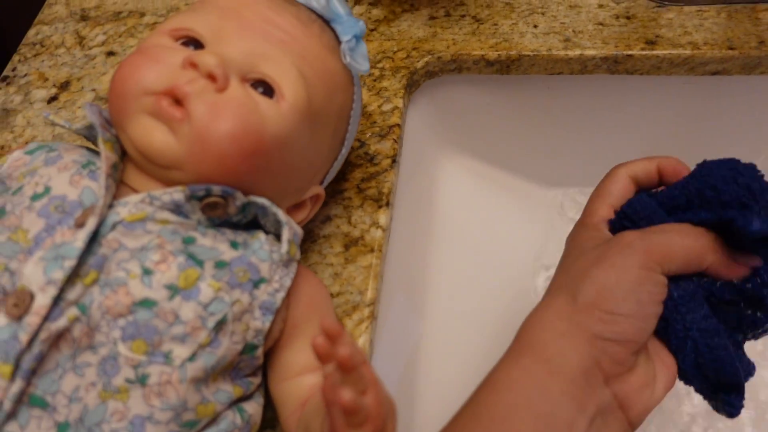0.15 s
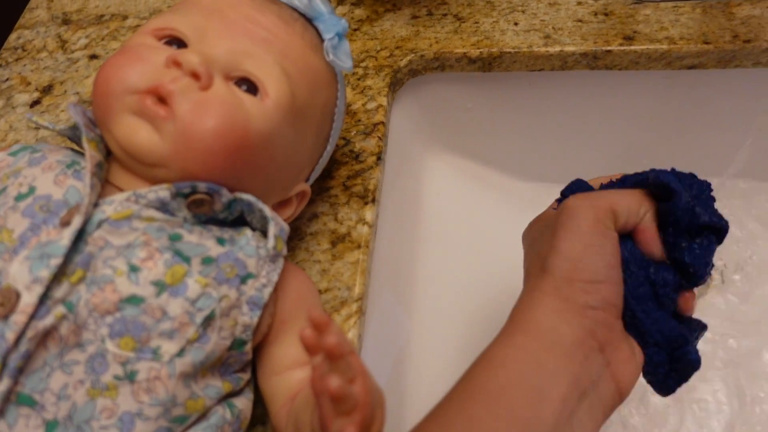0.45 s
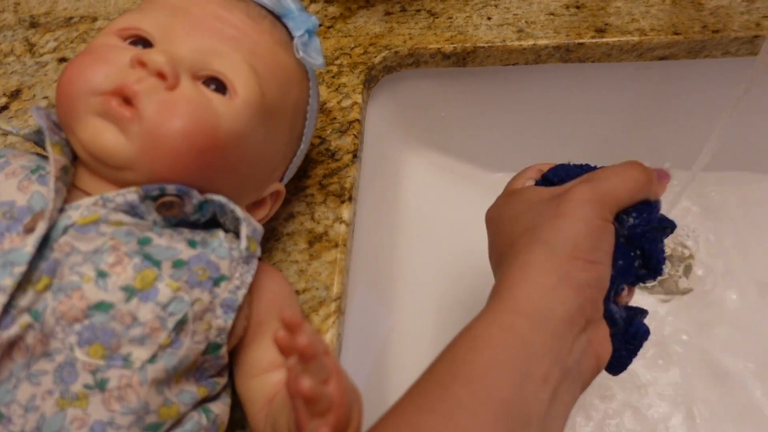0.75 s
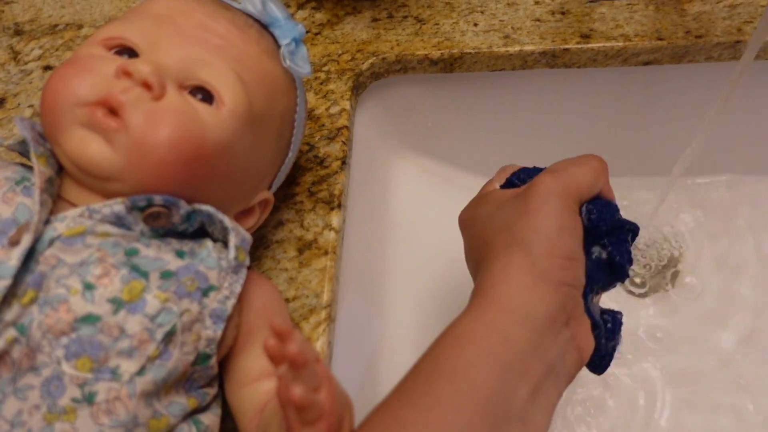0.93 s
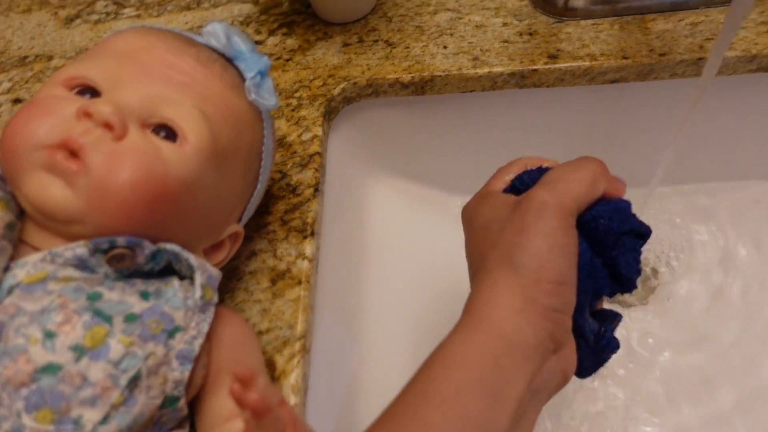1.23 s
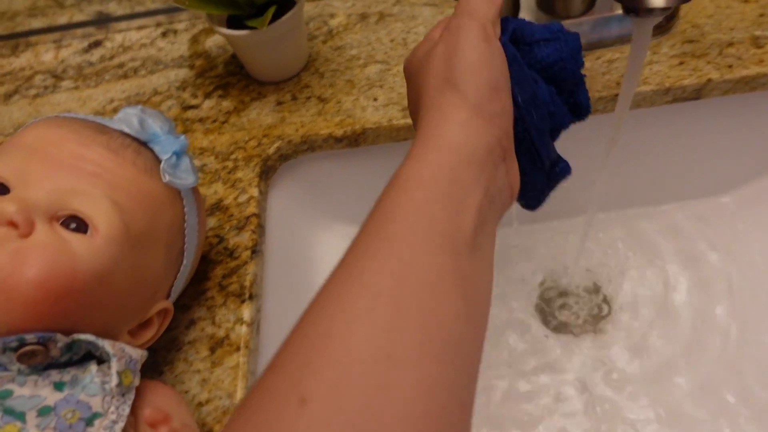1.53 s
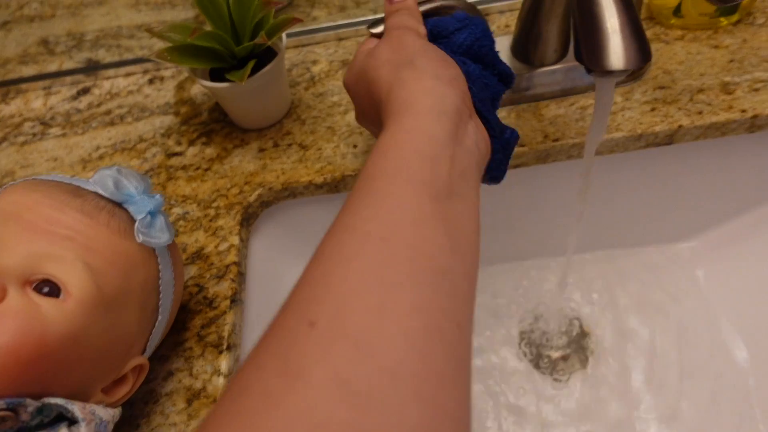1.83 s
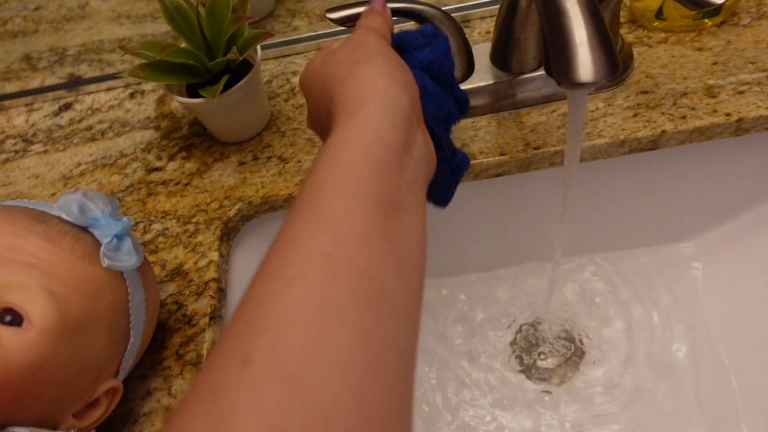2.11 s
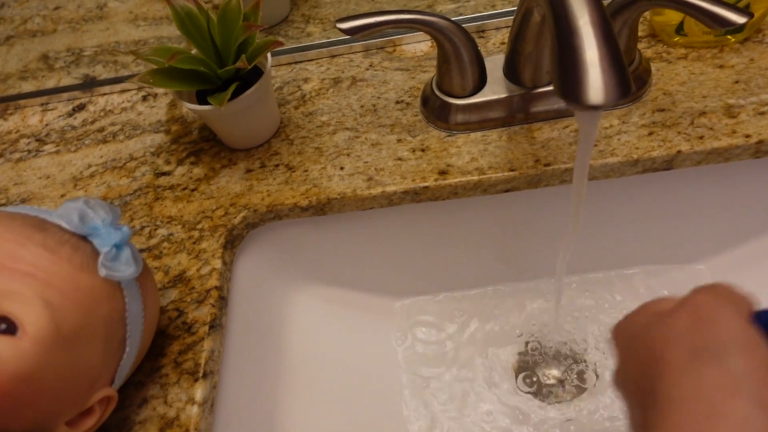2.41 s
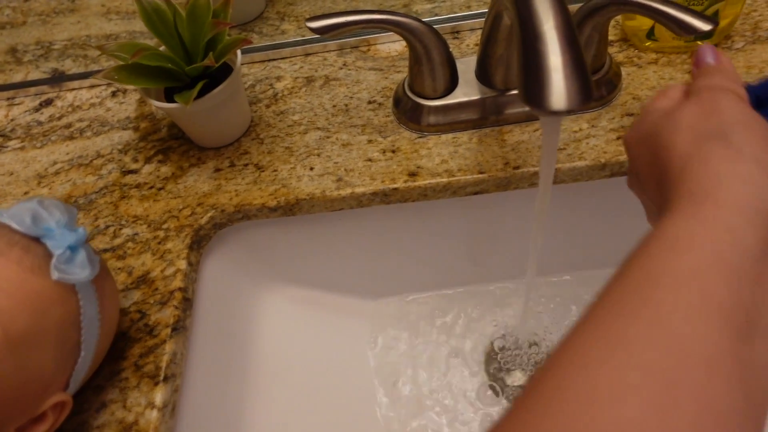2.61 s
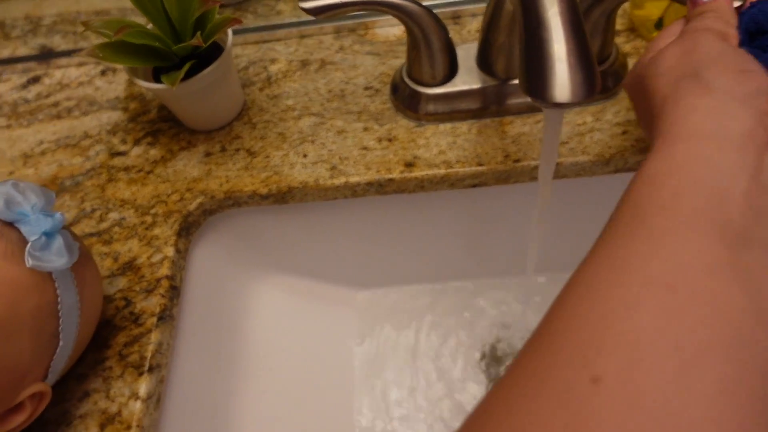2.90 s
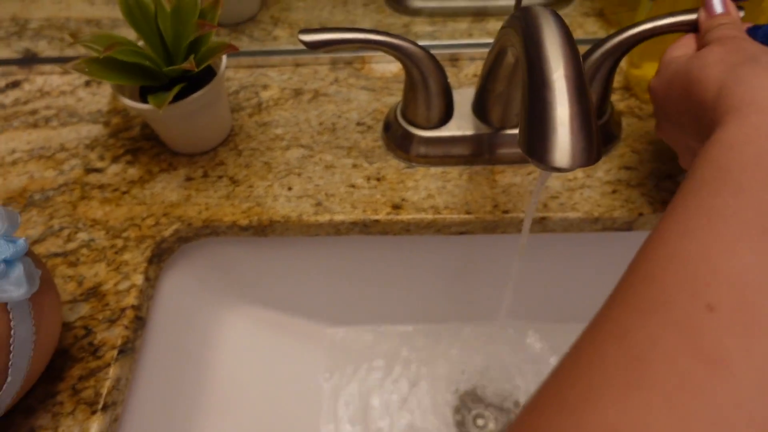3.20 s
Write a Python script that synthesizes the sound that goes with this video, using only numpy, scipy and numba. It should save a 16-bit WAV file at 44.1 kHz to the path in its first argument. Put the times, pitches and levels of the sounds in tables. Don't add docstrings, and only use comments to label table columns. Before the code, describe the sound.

A faucet runs into a ceramic sink, close to a handheld stereo microphone: bright flickering hiss, bubble plops, droplets and water slaps in a tiled bathroom with faint fan hum, easing as the tap is closed.

```python
import sys
import numpy as np
from scipy import signal
from scipy.fft import rfft, irfft
from scipy.io import wavfile
from scipy.ndimage import uniform_filter1d, map_coordinates
from numba import njit

SR = 44100
rng = np.random.default_rng(int(sys.argv[2]) if len(sys.argv) > 2 else 0)


def dump_mix(stems):
    frames = np.atleast_2d(stems).T
    limited = np.clip(frames, -1, 1)
    pcm = np.round(limited * 32767).astype(np.int16)
    wavfile.write(sys.argv[1], SR, pcm)


def volts(x):
    e = np.asarray(x, float) / 20
    return 10 ** e


N = 147735
GLIDE = 0.11


def level(x, db):
    return x * volts(db) / np.sqrt(np.mean(x ** 2))


def curve(table, column):
    table = np.array(table)
    return np.interp(np.arange(N) / SR, table[:, 0], table[:, column])


def walk(rate_hz):
    k = int(SR / rate_hz)
    held = np.repeat(rng.standard_normal(N // k + 1), k)
    return 1.3 * uniform_filter1d(uniform_filter1d(held, k), k)[:N]


def band(x, hz, width):
    edges_hz = [hz / width, min(hz * width, SR * .45)]
    return signal.sosfilt(signal.butter(2, edges_hz, "band", fs=SR, output="sos"), x)


def edge(x, hz, kind="low", order=2):
    return signal.sosfilt(signal.butter(order, hz, kind, fs=SR, output="sos"), x)


def colour(x, points):
    p = np.array(points)
    hz = np.maximum(np.fft.rfftfreq(N, 1 / SR), 1)
    gain_db = np.interp(np.log(hz), np.log(p[:, 0]), p[:, 1])
    return irfft(rfft(x) * volts(gain_db), N)


@njit
def grains(n, start, step, cycles, size, glide):
    y = np.zeros(n)
    for k in range(len(start)):
        first = int(start[k])
        span, phase = cycles[k] / step[k], 0.
        for i in range(min(int(2.5 * span), n - first)):
            u = i / span
            phase += step[k] * (1 + glide[k] * u)
            swell = min(1., i * step[k])
            y[first + i] += size[k] * swell * np.exp(-2.2 * u * (u + .4)) * np.sin(2 * np.pi * phase)
    return y


def swarm(count, lo_hz, hi_hz, cycles, spread_db):
    when, pitch, life, size, rise = rng.random((count, 5)).T
    busy = np.cumsum(volts(3.0 * walk(40)))
    start = np.interp(when, busy / busy[-1], np.arange(N) * 1.)
    hz = lo_hz * (hi_hz / lo_hz) ** pitch
    sizes = volts(-spread_db * np.log(size + 0.06))
    return grains(N, start, hz / SR, cycles * (.5 + life), sizes, GLIDE * 2 * rise)


def bursts(at_s, size, length_s):
    out = np.zeros(N)
    for s, g, d in zip(at_s, size, length_s):
        i = int(s * SR)
        t = np.arange(min(int(6 * d * SR), N - i)) / SR
        out[i:i + len(t)] += g * np.minimum(t / 0.00032, 1) * np.exp(-t / d)
    return out


def scatter(rows, width, rise_s, fall_s):
    out, t = np.zeros(N), np.arange(4096) / SR
    for (at, db, hz), noise in zip(rows, rng.standard_normal((len(rows), 2, len(t)))):
        ragged = 1 + .5 * np.tanh(level(uniform_filter1d(noise[1], size=80), 0))
        envelope = np.minimum(t / rise_s, 1) * np.exp(-t / fall_s)
        burst = level(band(noise[0], hz, width), db) * ragged * envelope
        i = int(at * SR)
        out[i:i + len(t)] += burst[:N - i]
    return out


# frequency in Hz, level in dB.
ROOM_SPECTRUM = [(15, -52), (25, -35), (64, -21), (114, -15.5), (188, -18), (230, -18), (300, -10),
                 (510, -120)]


def room_tone():
    fan_hz, fan_width_hz = 122.3, 19
    room = level(colour(rng.standard_normal(N), ROOM_SPECTRUM), -60)
    fan = band(rng.standard_normal(N), fan_hz, 1 + fan_width_hz / fan_hz / 2)
    return room + level(fan, -59)


def walls(water):
    t60_s, shared = 0.98, 0.57
    t = np.arange(SR // 2) / SR
    decay = np.exp(-np.log(1000) * t / t60_s) * np.minimum(t / 0.0012, 1)
    tail = rng.standard_normal((2, len(t))) * decay
    tail = tail + shared * tail.sum(axis=0)
    tail = edge(tail, 1400, "high")
    tail = tail / np.sqrt(np.sum(tail ** 2) / 2)
    return volts(-5.5) * signal.fftconvolve(water[None], tail, axes=1)[:, :N]


# frequency in Hz, level in dB, t60 in seconds.
MODES = [(300, -10, 0.19), (363.3, -6.5, 0.25), (372.4, -0.5, 0.092), (436.2, 3, 0.28), (434.8, -7, 0.12),
         (513.6, -12, 0.51), (737, -15, 0.18), (1070, -12.5, 0.076), (1640, -8.5, 0.2), (2346, -7, 0.076)]
# start in seconds, peak in dB, share to the modes below 400 Hz (0-1).
SLUG_HITS = [(0.258, -16, 0.46), (0.433, -21, 0.2), (0.602, -17, 0.73), (0.789, -16, 0.58), (0.865, -22, 1),
             (0.954, -22, 0.56), (1.115, -22.5, 0.14), (1.151, -16, 0.8), (1.243, -25.5, 0.38),
             (1.289, -25.5, 0), (1.524, -20.5, 0.92), (1.584, -17, 0.65), (2.029, -22.5, 1),
             (2.108, -22, 0.44), (2.265, -22, 0.02), (2.356, -20.5, 0.6), (2.476, -23.5, 0.36),
             (2.679, -23.5, 0.04), (2.72, -9.5, 0.84), (2.764, -15, 0.06), (3.016, -26.5, 0),
             (3.065, -17.5, 0.52), (3.192, -19.5, 0.48), (3.24, -19, 0.78), (0.168, -26, 1),
             (0.411, -29, 0), (0.486, -26, 0.66), (0.74, -29, 0.4), (1.387, -27.5, 0.14),
             (1.702, -29, 0.26), (1.85, -26.5, 1), (1.95, -22, 0.84), (1.992, -27.5, 0.12),
             (2.061, -20, 0.88), (2.396, -27, 0.2), (2.439, -28, 0), (2.533, -23, 0), (2.589, -29, 0),
             (0.203, -21, 0.45), (0.042, -27.5, 0.44), (2.82, -22.5, 0.2)]


def basin():
    rumble_db, slug_db, slosh = -7.5, -8.5, 0.007
    t, out = np.arange(SR // 2) / SR, 0
    when, size = rng.random((400, 2)).T
    patter = np.zeros(N)
    patter[(when * N).astype(int)] = volts(-3.5 * np.log(size + 0.2))
    patter = level(patter, 0) + 0.36 * rng.standard_normal(N)
    patter = patter * volts(curve(FLOW, 3) + rumble_db)
    for hz, db, t60 in MODES:
        ring = np.exp(-np.log(1000) * t / t60) * np.sin(2 * np.pi * hz * t)
        knock = np.zeros(N)
        for s, peak_db, low in SLUG_HITS:
            low = np.clip(low, .05, .95)
            share = low if hz < 400 else 1 - low
            knock[int(s * SR)] = volts(peak_db + slug_db) * 2 * share
        force = patter / np.sqrt(np.sum(ring ** 2)) + uniform_filter1d(knock, size=25)
        rung = signal.fftconvolve(force, ring)[:N]
        drift = slosh * SR / 12 * walk(16) / 4
        out = out + volts(db) * map_coordinates(rung, [np.arange(N) + drift], order=1, mode="nearest")
    return out


def slaps():
    rows = [(at, db - 22, 700) for at, db, _ in SLUG_HITS]
    return scatter(rows, width=1.05, rise_s=0.00028, fall_s=0.04)


# start in seconds, peak in dB, colour in Hz.
DROPS = [(0.204, -8.5, 4270), (0.366, -10.5, 4100), (0.556, -10, 4570), (0.5833, -11, 3100),
         (0.6, -6.5, 2540), (0.619, -9, 8800), (0.9536, -10, 3070), (1.082, -14.5, 3260), (1.13, -7, 4070),
         (1.26, -10.5, 3450), (1.517, -15, 3500), (1.5848, -7.5, 3450), (1.6053, -11, 3940),
         (1.656, -22, 5600), (1.815, -16, 4200), (1.8612, -11, 3400), (1.8906, -7, 4020), (1.99, -10, 7540),
         (2.059, -12, 3160), (2.1972, -10.5, 3960), (2.7228, -11.5, 3900), (3.051, -13.5, 4030),
         (3.0692, -9, 7330), (3.125, -13, 3470), (3.1567, -14.5, 6530), (3.1906, -13.5, 5880),
         (3.295, -14.5, 6000), (0.0434, -15, 7500), (0.135, -12.5, 5600), (0.227, -17, 6600),
         (0.2997, -17, 9050), (0.5135, -16, 6370), (0.7387, -15, 6640), (1.0096, -15, 9300),
         (1.365, -16, 6460), (2.5117, -17, 2290), (2.5321, -11.5, 10200), (2.6748, -9.5, 2400),
         (2.6938, -14, 8650), (2.822, -23, 12000), (3.2098, -21, 9400), (3.339, -28, 3630)]


def splashes():
    fall_s, tone_db, noise_db = 0.0037, -5, 2.5 - 12
    at_s, db, hz = np.array(DROPS, float).T
    tone = grains(N, at_s * SR, hz / SR, hz * fall_s, volts(db + tone_db), np.full(len(hz), GLIDE))
    rows = [(at, peak_db + noise_db, centre_hz) for at, peak_db, centre_hz in DROPS]
    return tone + scatter(rows, width=3, rise_s=0.00059, fall_s=fall_s)


# start in seconds, peak in dB, pitch in Hz, life in cycles.
LARGE_BUBBLES = [(0.003, -10, 636, 5.5), (0.163, -8, 1238, 29), (0.257, -9.5, 1290, 7.4),
                 (0.36, -6.5, 1434, 14.4), (0.491, -15.5, 1410, 21), (0.574, -16, 1322, 39),
                 (0.666, -9, 1070, 5.7), (0.727, -8, 2394, 33), (0.796, -11.5, 1720, 9.8),
                 (0.953, -9.5, 1373, 23), (0.966, -13, 3230, 29), (1.151, -14.5, 1750, 18),
                 (1.172, -8.5, 1227, 19), (1.2, -11, 2000, 15), (1.239, -24, 1026, 44),
                 (1.261, -11, 2246, 34), (1.315, -11, 807, 27.5), (1.35, -16.5, 800.5, 40),
                 (1.379, -17.5, 1040, 33), (1.411, -15.5, 858, 22), (1.513, -19.5, 734, 17),
                 (1.586, -9, 1495, 14), (2.195, -17, 2310, 25), (2.262, -23, 1000, 18.2),
                 (2.674, -16.5, 1640, 46), (2.758, -15, 715, 7.8), (3.07, -6, 2220, 5.2),
                 (3.271, -22.5, 782, 22), (3.324, -14.5, 546, 15.5), (3.339, -18.5, 1100, 18)]
# start in seconds, peak in dB, pitch in Hz, life in cycles.
DRAIN_GULPS = [(0.279, -17, 525, 14), (0.32, -16, 1390, 10), (0.345, -17, 1780, 9.3),
               (0.601, -14.5, 558, 12), (1.031, -23, 1020, 25), (1.2925, -20, 2000, 17),
               (1.338, -11, 2830, 26), (1.413, -16, 3130, 18), (1.596, -8.5, 2020, 12),
               (1.706, -23.5, 840, 27), (1.873, -18, 510, 6.1), (1.965, -19, 1820, 21),
               (1.988, -17.5, 536, 6.5), (2.099, -22, 756, 11), (2.129, -19.5, 850, 17),
               (2.142, -16, 1790, 22), (2.16, -22, 950, 15), (2.308, -17.5, 560, 7.4),
               (2.317, -17.5, 1800, 19), (2.6, -18.5, 497, 7.1), (2.7202, -13.5, 2390, 20),
               (2.82, -20, 1640, 22), (2.871, -18, 2340, 14), (2.899, -15, 533, 6.9), (3.297, -20, 840, 12),
               (0.362, -11, 2240, 18), (0.632, -12, 1940, 19), (0.682, -23, 1070, 62),
               (0.739, -18, 1750, 16), (0.905, -23, 1770, 18), (0.19, -17, 1350, 14), (2.745, -24, 610, 10)]
# start in seconds, peak in dB, pitch in Hz, life in cycles.
EXTRA_GULP = [
    (0.667, -11.5, 735, 9),
]
# start in seconds, peak in dB, pitch in Hz, life in cycles, glide ratio.
RISING_BUBBLE = (0.07, -21, 732, 26, 1)


def bubbles():
    bubble_db, froth_db = -6.5, -19
    rows = list(LARGE_BUBBLES) + list(DRAIN_GULPS) + list(EXTRA_GULP)
    at_s, db, hz, cycles = np.array(rows, float).T
    step = hz / SR / (1 + 0.5 * GLIDE)
    out = grains(N, at_s * SR, step, cycles, volts(db + bubble_db), np.full(len(hz), GLIDE))
    at_s, db, hz, cycles, rise = np.array(RISING_BUBBLE, float)[:, None]
    out = out + grains(N, at_s * SR, hz / SR, cycles, volts(db + bubble_db), rise)
    froth = [(at, peak_db + froth_db, centre_hz) for at, peak_db, centre_hz, _ in LARGE_BUBBLES]
    return out + scatter(froth, width=1.25, rise_s=0.003, fall_s=.02)


# frequency in Hz, level in dB per Hz.
JET_SPECTRUM = [(350, -59), (600, -17), (1040, 2.5), (1700, 0), (4280, -1.5), (8000, -2.5), (12000, -6.5),
                (16500, -3.5)]


def fizz():
    fine = swarm(count=3000, lo_hz=2264, hi_hz=14720, cycles=27.5, spread_db=3.0)
    spatter = 0
    for hz in 2300 * 2 ** np.arange(0, 2.6, .5):
        when, size, length = rng.random((90, 3)).T
        ticks = bursts(when * N / SR, volts(-3.5 * np.log(size + 0.075)), 0.0036 + 0.001 * length)
        spatter = spatter + band(ticks * rng.standard_normal(N), hz, 1.2)
    return level(colour(fine, JET_SPECTRUM), -10) + level(colour(spatter, JET_SPECTRUM), -7)


def spray(wide):
    shared_db, flicker_db, wide_hz = -1, 2, 9700
    out, shared = 0, walk(45.17)
    for hz in 500 * 2 ** np.arange(0, 5.1, .5):
        share = (hz / wide_hz) ** 2 if wide else 1
        swell = volts(shared_db * shared + flicker_db * walk(50))
        out = out + share * swell * band(rng.standard_normal(N), hz, 1.19)
    return level(colour(out, JET_SPECTRUM), -4)


# start in seconds, fine spray in dB, churn of the pool in dB, force on the basin in dB.
FLOW = [(0, -31.5, -36.5, -40.5), (.28, -31.5, -34.5, -36), (.6, -28.5, -33, -40), (.88, -33, -36, -36.5),
        (1.05, -31.5, -41.5, -37.5), (1.3, -28.5, -32, -36.5), (1.55, -33, -34, -41.5),
        (1.8, -35.5, -37.5, -35.5), (2.05, -32, -34.5, -42), (2.35, -33, -35.5, -33), (2.6, -35, -36, -35),
        (2.75, -32.5, -34.5, -30.5), (2.95, -33.5, -33.5, -32), (3.12, -34.5, -39.5, -36.5),
        (3.24, -37.5, -44.5, -44), (3.35, -34, -35, -30)]


def running_water():
    jet, churn = volts(curve(FLOW, 1)), volts(curve(FLOW, 2))
    closing_s, closed_db = (3.08, 3.1), -18
    mist = volts(-33 + np.interp(np.arange(N) / SR, closing_s, (0, closed_db)))
    hiss = spray(wide=False) + fizz()
    body = edge(hiss, 4500)
    air = hiss - edge(hiss, 10000)
    gurgle = level(swarm(count=1300, lo_hz=726, hi_hz=2840, cycles=4.1, spread_db=2.0), -7.5)
    water = jet * volts(3.5) * (hiss - body - air)
    water = water + mist * volts(5) * air
    water = water + churn * (volts(6) * body + gurgle)
    side = np.sqrt(jet * mist) * spray(wide=True) * 0.23 * 2
    return water, side


# start in seconds, left minus right in dB.
CAMERA = [
    (0.0, -0.5),
    (3.19, 0),
    (3.35, 0.5),
]


def scene():
    left_right = np.array([[1], [-1]])
    water, side = running_water()
    water = water + bubbles() + splashes() + slaps()
    aim_db = curve(CAMERA, 1) / 2 * 3.54
    near = (water + walls(water)) * volts(np.array([aim_db, -aim_db]))
    ring = basin()
    side = side + 0.051 * np.roll(ring, shift=60)
    near = near + side * left_right + ring
    near = edge(near, 358, "high", order=6)
    return near + room_tone() + 0.18 * room_tone() * left_right


def roll_off(x):
    return signal.sosfilt(signal.butter(12, 16660, fs=SR, output="sos"), x)


def record(dry):
    top_hz = 15760
    mix = signal.sosfilt(signal.ellip(10, .3, 70, top_hz, fs=SR, output="sos"), dry)
    return roll_off(mix)


dry = scene()
out = record(dry)
dump_mix(out)
```